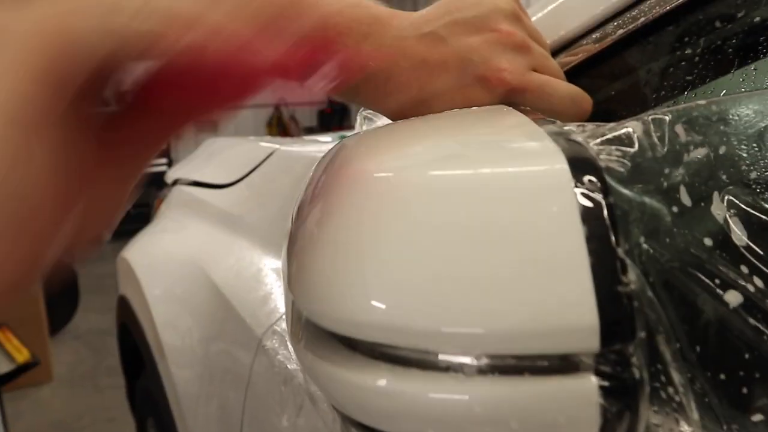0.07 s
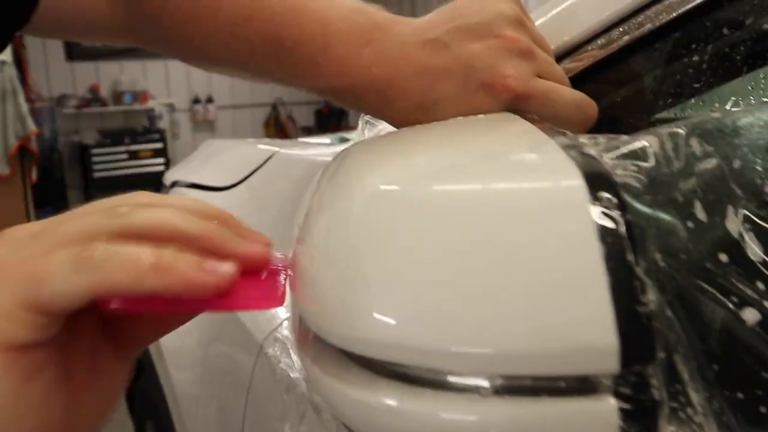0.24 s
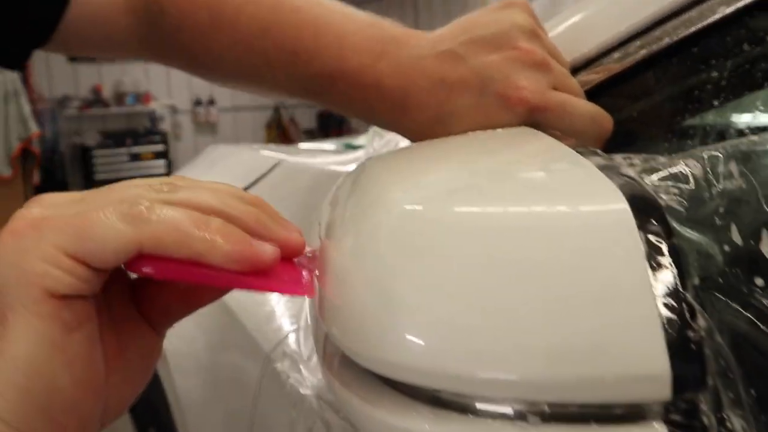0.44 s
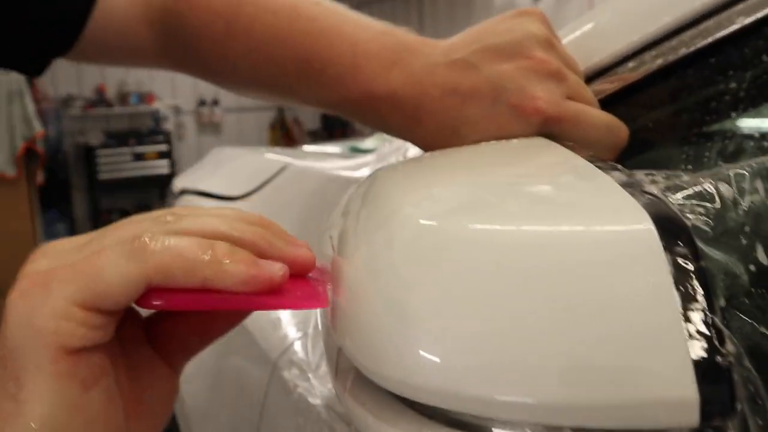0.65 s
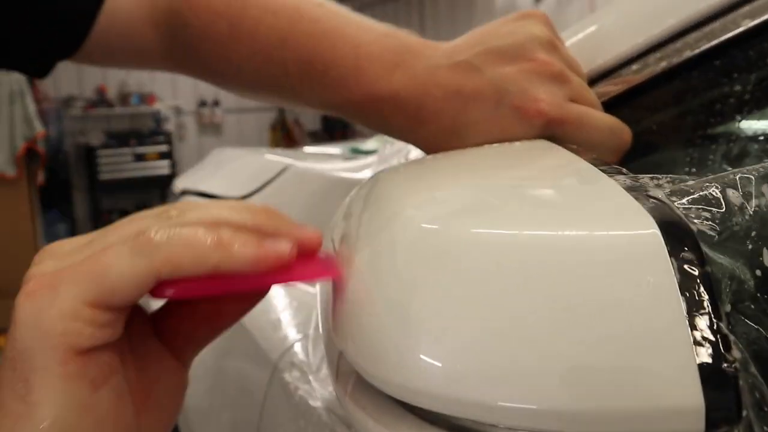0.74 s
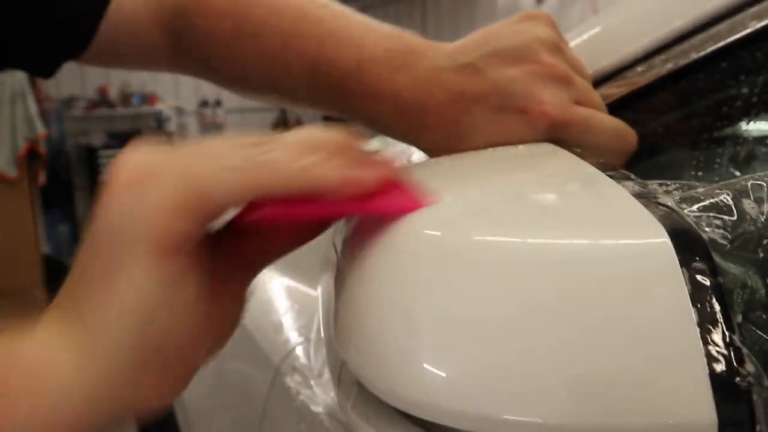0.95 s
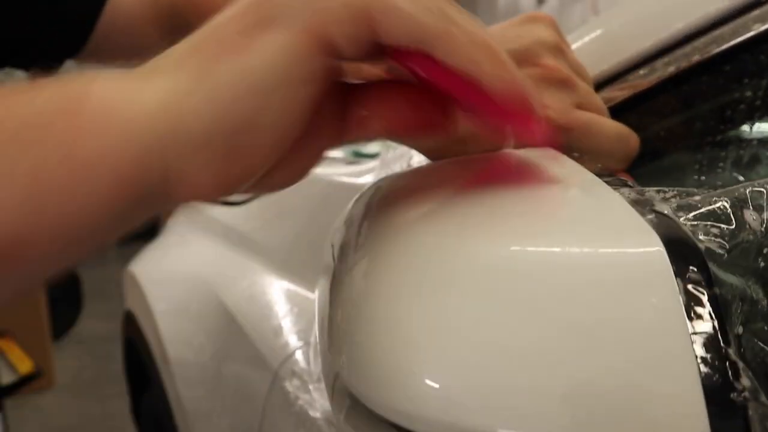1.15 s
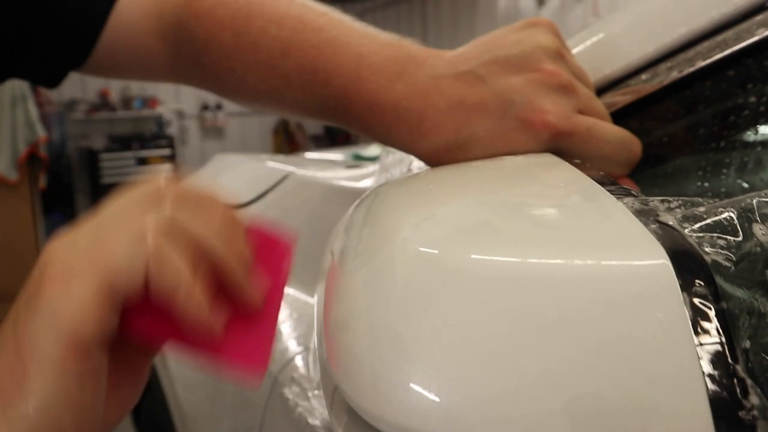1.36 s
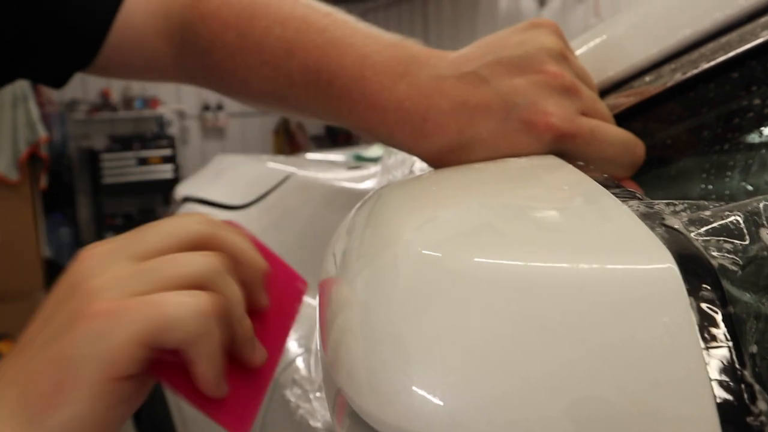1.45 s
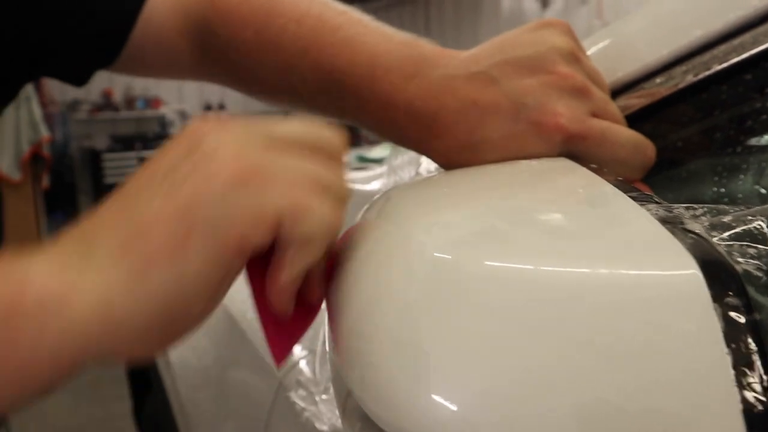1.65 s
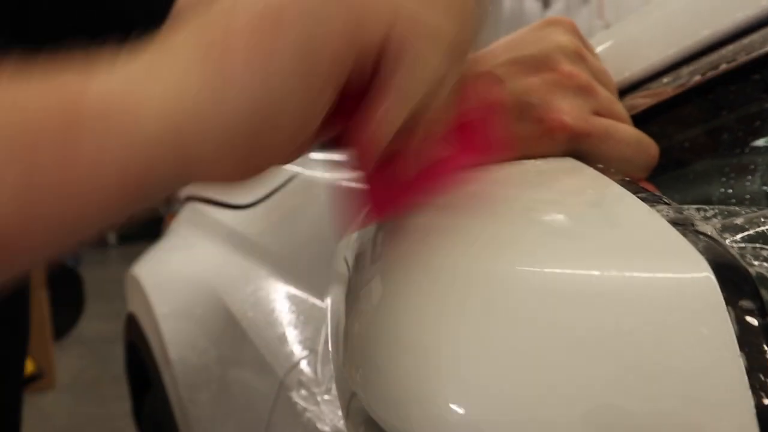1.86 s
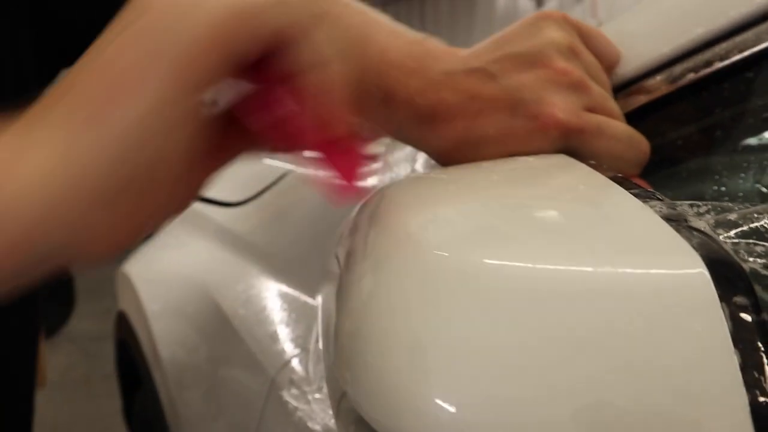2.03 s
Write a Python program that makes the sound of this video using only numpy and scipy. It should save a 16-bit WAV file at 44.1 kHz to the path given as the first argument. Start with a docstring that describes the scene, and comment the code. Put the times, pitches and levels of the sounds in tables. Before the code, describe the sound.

A plastic squeegee knocks sharply on a car's hollow wing mirror at 0.2 seconds and again around 0.7, close by, with soft door thuds. Faint rubbing follows around 1 second, then lighter taps, one at 1.5. From 1.8 the wet film crackles amid small knocks, the blade squeaks briefly at 1.9 and snaps free at 2. The workshop rings briefly over steady low noise.

```python
"""A plastic squeegee works wet film onto a car's wing mirror, close by, in a workshop.
Blade and knuckles knock the hollow housing and rock the door. The blade sticks and slips, shaking the
housing and crackling in the film; it squeaks once and lets go with a snap.
The room rings briefly over a steady low noise."""
import sys
import numpy as np
from scipy import signal
from scipy.fft import rfft, irfft
from scipy.io import wavfile
from scipy.ndimage import uniform_filter1d

SR = 44100
rng = np.random.default_rng(int(sys.argv[2]) if len(sys.argv) > 2 else 0)


def materialize(psi):
    """Save the field psi as 16-bit PCM at rate SR to the path in sys.argv[1].

    A 1-D psi becomes a single channel; in a 2-D psi each row is a channel.
    """
    bounded = np.clip(np.atleast_2d(psi).T, -1, 1)
    quanta = np.round(bounded * 32767).astype(np.int16)
    wavfile.write(sys.argv[1], SR, quanta)


N = 92610
IR_SAMPLES = 8192
TIME_S = np.arange(N) / SR
FREQ_HZ, IR_FREQ_HZ = np.fft.rfftfreq(N, 1 / SR), np.fft.rfftfreq(IR_SAMPLES, 1 / SR)
SIDE = np.array([[1], [-1]])

# wet-film crackle spectrum: f/Hz, level/dB
FILM_SPECTRUM = [(300, -15), (1200, -6), (1900, -6), (2700, -0.5), (3800, -3.5), (5200, -16), (11000, -17),
                 (15000, -24)]
FILM_T60_S = 0.0087


def undb(db):
    return 10 ** (np.asarray(db) / 20)


def unit_rms(x):
    return x / np.std(x)


def gain_at(curve, hz):
    """Linear gain of an (f/Hz, level/dB) curve, interpolated in log f."""
    curve_hz, curve_db = np.array(curve, float).T
    return undb(np.interp(np.log(np.maximum(hz, 1)), np.log(curve_hz), curve_db))


def min_phase(gain):
    """Minimum-phase spectrum with the given gains."""
    cepstrum = irfft(np.log(gain + 1e-9))
    cepstrum[1:IR_SAMPLES // 2] *= 2
    cepstrum[IR_SAMPLES // 2 + 1:] = 0
    return np.exp(rfft(cepstrum))


def convolve(x, ir):
    return signal.fftconvolve(x, ir)[:N]


def colour(x, curve):
    """Unit-energy filter shaped by an (f/Hz, level/dB) curve."""
    ir = irfft(min_phase(gain_at(curve, IR_FREQ_HZ)))
    return convolve(x, ir / np.linalg.norm(ir))


def rise(tau_s):
    return 1 - np.exp(-TIME_S / tau_s)


def decay(t60_s):
    return np.exp(-np.minimum(np.log(1000) * TIME_S / t60_s, 40))


def mode(hz, t60_s):
    return np.sin(2 * np.pi * hz * TIME_S) * decay(t60_s)


def at(x, start_s):
    """Place x in N samples of silence."""
    placed, start = np.zeros(N), round(start_s * SR)
    placed[start:start + len(x)] = x[:N - start]
    return placed


def diffuse_noise():
    """Stereo noise, narrow in the bass, wide in the treble."""
    # stereo width: f/Hz, side minus mid/dB
    width = [(50, -26.5), (300, -6), (700, -5), (1500, -0.5), (4000, 1.5), (12000, 7)]
    mid, side = rng.standard_normal((2, N))
    return mid + SIDE * irfft(rfft(side) * gain_at(width, FREQ_HZ), N)


def room_noise(rms_db=-47.5):
    """Steady low noise of the workshop."""
    # noise spectrum: f/Hz, relative density/dB
    spectrum = [(20, -3), (45, 0), (75, 1.5), (140, -1.5), (260, -4.5), (600, -13), (1200, -15.5),
                (3000, -23), (6000, -31.5), (10000, -39), (14000, -56)]
    noise = irfft(rfft(diffuse_noise()) * gain_at(spectrum, FREQ_HZ), N)
    return undb(rms_db) * unit_rms(noise)


def reverb(x):
    """Diffuse workshop tail with its own level and decay in each band."""
    # reverberation bands: f/Hz, level/dB, t60/s
    bands = [(80.5, -2, 0.64), (225, -11.5, 0.55), (435, -17.5, 0.6), (925, -10.5, 0.87), (1780, -8, 1),
             (3670, -11, 0.92), (7200, -14, 0.82), (10900, -18, 0.4), (14000, -34, .3)]
    noise_spectrum = rfft(diffuse_noise())
    log_centres = np.log([hz for hz, _, _ in bands])
    ir = 0
    for selector, (_, db, t60_s) in zip(np.eye(len(bands)), bands):
        band_gain = np.interp(np.log(FREQ_HZ + 1), log_centres, selector)
        tail = decay(t60_s) * rise(0.016)
        ir += irfft(noise_spectrum * band_gain, N) * undb(db) * tail / np.linalg.norm(tail)
    return np.array([convolve(x, channel) for channel in ir])


def door():
    """Pushed, the door thuds, then sways on its seals."""
    # pushes: t/s, sway/dB, thud/dB
    pushes = [(0.223, -48, -26), (0.345, -29, -22.5), (0.715, -34, -47), (0.777, -27.5, -25.5),
              (0.929, -41, -32.5), (1.894, -36, -32)]
    sway = mode(hz=43.6, t60_s=0.3) * rise(0.024)
    thud = mode(hz=95.4, t60_s=0.06) * rise(0.0031)
    return sum(at(undb(sway_db) * sway + undb(thud_db) * thud, s) for s, sway_db, thud_db in pushes)


def housing_gain():
    """Resonances of the hollow housing, softened by the blade's give."""
    # housing modes: f/Hz, nominal width/Hz, level/dB
    modes = [(127, 40, -8), (162.6, 20.4, -2), (216, 22, 1), (264, 46, 0), (337, 41, 0), (393, 56.4, 1.5),
             (537.4, 29.5, 1.5), (620.5, 86, 0.5), (733, 115, -1.5), (829, 67, -3), (930, 50, -6),
             (1105, 125, -16.5), (1607, 98, -15), (1966, 140, -14.5)]
    skirt_exponent, corner_hz, db_per_octave = 1.198, 1150, -7
    f = IR_FREQ_HZ + 1
    power = 0
    for hz, width_hz, db in modes:
        detuning = (f * f - hz * hz) / (f * width_hz)
        power += undb(db) ** 2 / (1 + detuning ** 2) ** skirt_exponent
    octaves_above = np.log2(np.maximum(f / corner_hz, 1))
    return np.sqrt(power) * undb(db_per_octave * octaves_above)


def housing_ring(low_db, mid_db, upper_db, lag_s=0):
    """Response to a light touch, then the full push; low bending waves arrive last."""
    f = IR_FREQ_HZ
    travel_s, reference_hz = 0.001303, 506
    contact = gain_at([(256, low_db), (546, mid_db), (880, upper_db)], f)
    bending = np.exp(-4j * np.pi * travel_s * np.sqrt(reference_hz * f))
    touch_and_push = undb(-6.5) + np.exp(-2j * np.pi * f * lag_s)
    echo_s, echo_db = 0.007293, -9
    door_echo = 1 - undb(echo_db) * np.exp(-2j * np.pi * f * echo_s)
    return irfft(min_phase(housing_gain() * contact) * bending * touch_and_push * door_echo)


def film_pops():
    """Sharp pops as the wet film lifts under the blade."""
    # pops: t/s, level/dB
    pops = [(1.8200, -36), (1.823, -21), (1.836, -17.5), (1.8473, -25)]
    envelope = sum(at(undb(db) * decay(FILM_T60_S), s) for s, db in pops)
    return colour(envelope * rng.standard_normal(N), FILM_SPECTRUM)


def blade_snap():
    """Bright double click as the blade leaves the film."""
    # clicks: t/s, level/dB
    clicks = [(1.99, -15.5), (1.9908, -19.5)]
    # click modes: f/Hz, level/dB, t60/s
    modes = [(5820, -2.5, 0.012), (8500, -4, 0.0019), (10100, -5, 0.0017), (11400, -14.5, 0.0057),
             (12700, -25, .003)]
    ringing = sum(undb(db) * mode(hz, t60_s) for hz, db, t60_s in modes)
    click = np.diff(ringing)  # thins the bass
    return sum(at(undb(db) * click, s) for s, db in clicks)


def blade_squeak(wobble_fraction=0.008, flutter_db=1):
    """The edge grips and chatters fast enough to sing, sagging in pitch."""
    # squeak contour: t/s, f/Hz, level/dB
    contour = [(1.8797, 3623, -30), (1.8803, 3744, -14.5), (1.8824, 3627, -14.5), (1.8843, 3880, -22),
               (1.8864, 3406, -14), (1.8905, 2978, -17), (1.8934, 3186, -27), (1.901, 3160, -31),
               (1.901, 3260, -45)]
    # harmonics 1-4: level/dB
    harmonics_db = [0, -8.5, -14, -19.5]
    times_s, pitch_hz, level_db = np.array(contour).T
    wobble, flutter = (unit_rms(uniform_filter1d(rng.standard_normal(N), size=50)) for _ in range(2))
    hz = np.interp(TIME_S, times_s, pitch_hz) * (1 + wobble_fraction * wobble)
    phase = 2 * np.pi * np.cumsum(hz) / SR
    gate = (TIME_S > times_s[0]) & (TIME_S < times_s[-1])
    envelope = gate * undb(np.interp(TIME_S, times_s, level_db) + flutter_db * flutter)
    return envelope * sum(undb(db) * np.sin(k * phase) for k, db in enumerate(harmonics_db, 1))


def blade_strokes(median_slip_hz=600, scatter_db=3, edge_s=0.012):
    """Uneven stick-slip: each slip shakes the housing and crackles in the wet film."""
    # strokes: t/s, length/s, housing/dB, crackle/dB
    strokes = [(0.663, .018, -23, -62), (0.692, 0.018, -30.5, -57), (0.851, 0.201, -46, -61.5),
               (1.830, 0.028, -30.5, -32.5)]
    gap_draw, force_draw = rng.standard_normal((2000, 2)).T
    slip_times_s = np.cumsum(np.exp(0.5 * gap_draw)) / median_slip_hz
    slip_force = undb(scatter_db * np.clip(force_draw, -1.6, 1.6))
    slips = np.bincount((slip_times_s * SR).astype(int), slip_force, N)[:N]
    judder_gain, crackle_gain = 0, 0
    for start_s, length_s, housing_db, crackle_db in strokes:
        inside_s = np.minimum(TIME_S - start_s, start_s + length_s - TIME_S)
        pressure = np.clip(inside_s / edge_s + 0.5, 0, 1)
        judder_gain += undb(housing_db) * pressure
        crackle_gain += undb(crackle_db) * pressure
    ir = housing_ring(low_db=3.5, mid_db=0.5, upper_db=-1)
    judder = convolve(judder_gain * unit_rms(slips - slips.mean()), ir / np.linalg.norm(ir))
    crackle = unit_rms(convolve(slips, decay(FILM_T60_S)) * rng.standard_normal(N))
    return judder, colour(crackle_gain * crackle, FILM_SPECTRUM)


def knocks(tick_db=-1):
    """The plastic blade ticks and clacks on the housing, which rings hollow."""
    # knocks: t/s, low/dB, mid/dB, upper/dB, touch-to-push lag/s, blade edge/dB
    hits = [(0.221, 30.5, 32, 28, 0.00021, -15.5), (0.6600, -3, -7, 4, 0.0057, -34.5),
            (0.6850, 13, 18.5, 26, 0.0033, -27), (0.7145, 26.5, 26.5, 23.5, 0.0038, -19.5),
            (0.975, 11, 2.5, 1, 0.0038, -37), (1.1031, 2, 3, 1, 0.003, -70),
            (1.2210, -13, -23, -19, 0.0028, -49), (1.4795, 14.5, 14, 9.5, .0038, -40),
            (1.632, -2, -1, -1.5, 0.00469, -56), (1.8515, 12.5, 17, 6.5, 0.0016, -35),
            (1.862, 10.5, 14.5, -2.5, 0.00021, -24.5), (1.9005, 13.5, 11, 11, 0.0043, -41),
            (2.0440, 2, -5, 1, 0.0034, -50)]
    # blade modes: f/Hz, level/dB, t60/s
    modes = [(1205, -7.5, 0.023), (2140, -11, .013), (2667, -7.5, .011), (4380, -14.5, .006),
             (3500, -7.5, 0.0084), (6620, -12.5, 0.0033)]
    # edge tick spectrum: f/Hz, level/dB
    tick_spectrum = [(200, 11), (1000, 4.5), (2000, -3), (3000, -4), (4600, -13), (7500, -20.5),
                     (11000, -25), (15000, -31)]
    clack = sum((-1) ** k * undb(db) * mode(hz, t60_s) for k, (hz, db, t60_s) in enumerate(modes))
    ringing, tick_envelope = 0, 0
    for start_s, low_db, mid_db, upper_db, lag_s, edge_db in hits:
        hollow = housing_ring(low_db, mid_db, upper_db, lag_s)
        ringing += at(hollow + undb(edge_db) * clack[:IR_SAMPLES], start_s)
        tick_envelope += at(undb(edge_db + tick_db) * decay(t60_s=0.025), start_s)
    return ringing + colour(tick_envelope * rng.standard_normal(N), tick_spectrum)


def scene():
    """Housing and blade close by, the blade's treble glancing off the paint, the workshop around."""
    judder, crackle = blade_strokes()
    body = knocks() + judder
    blade = crackle + film_pops() + blade_squeak() + blade_snap()
    left_minus_right_db, glance_db, glance_lag_s = -1, -10.5, 0.0004
    direct = body + blade * undb(SIDE * left_minus_right_db / 2)
    glance = SIDE * undb(glance_db) * at(blade, glance_lag_s)
    return direct + glance + door() + reverb(body + blade) + room_noise()


def record(dry):
    """Microphone treble roll-off, then the recorder's steep low-pass."""
    microphone = signal.butter(6, 13100, fs=SR, output="sos")
    recorder = signal.ellip(8, 0.2, 70, 15900, fs=SR, output="sos")
    return signal.sosfilt(recorder, signal.sosfilt(microphone, dry))


dry = scene()
out = record(dry)
materialize(out)
```